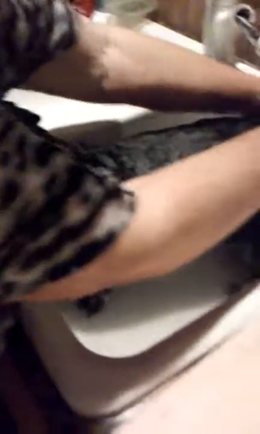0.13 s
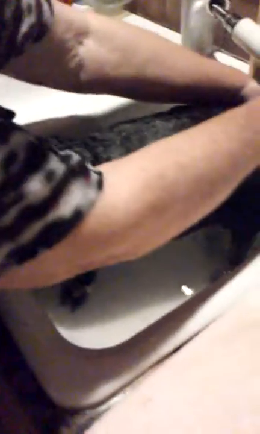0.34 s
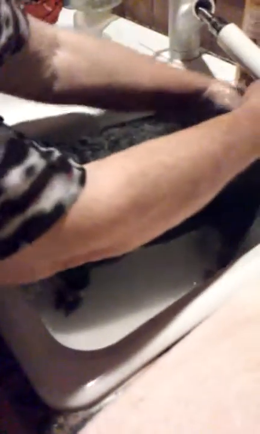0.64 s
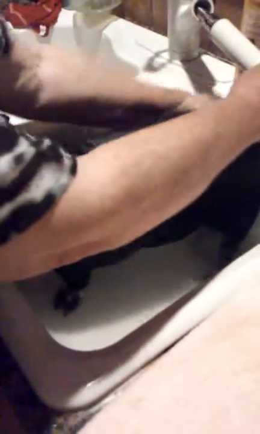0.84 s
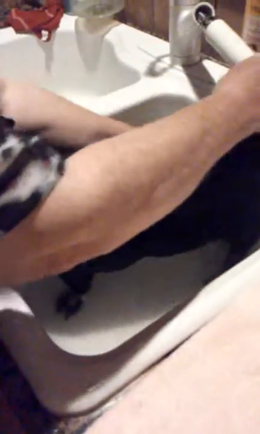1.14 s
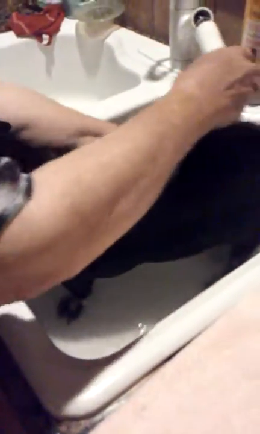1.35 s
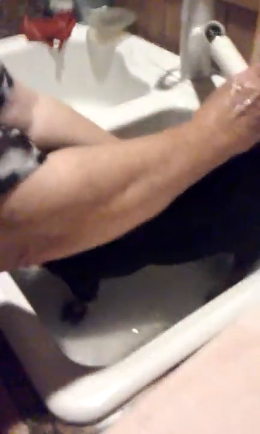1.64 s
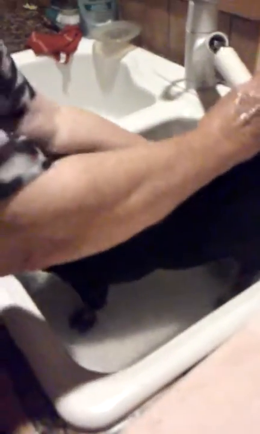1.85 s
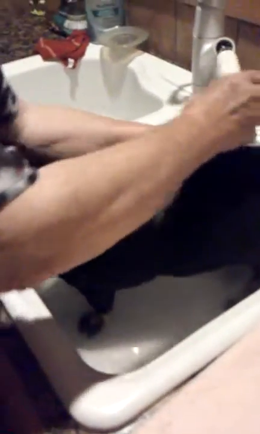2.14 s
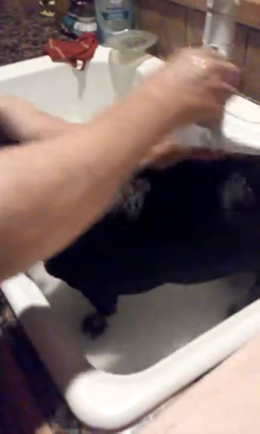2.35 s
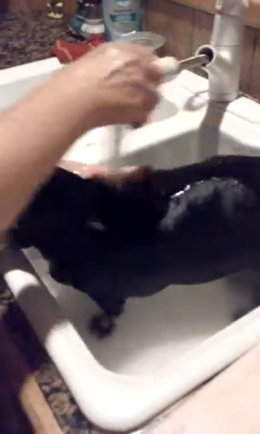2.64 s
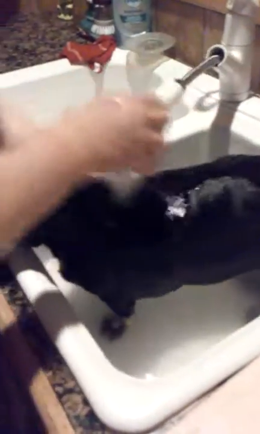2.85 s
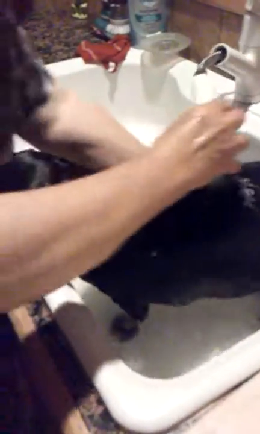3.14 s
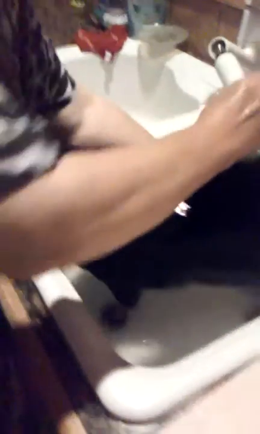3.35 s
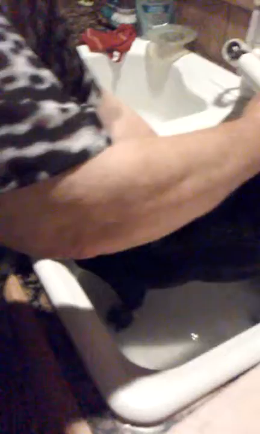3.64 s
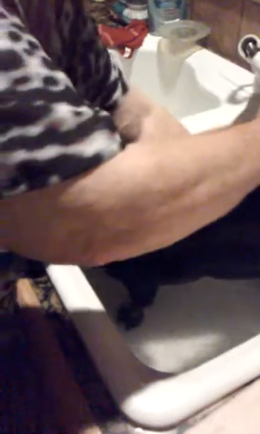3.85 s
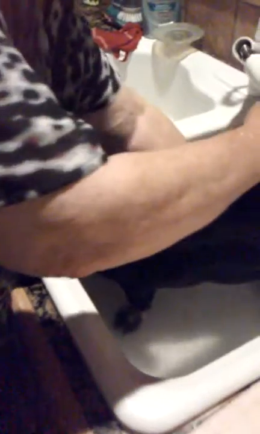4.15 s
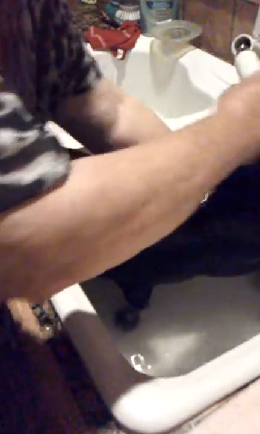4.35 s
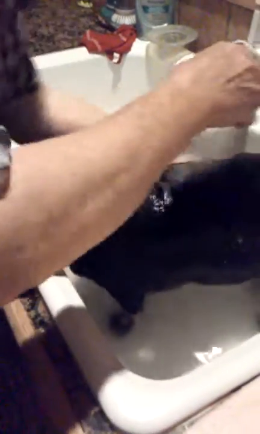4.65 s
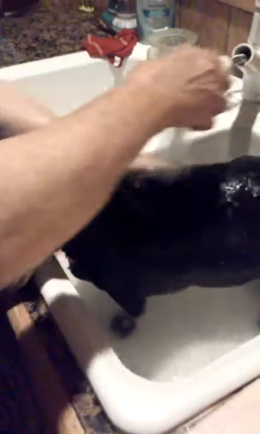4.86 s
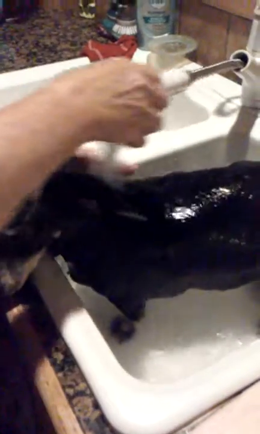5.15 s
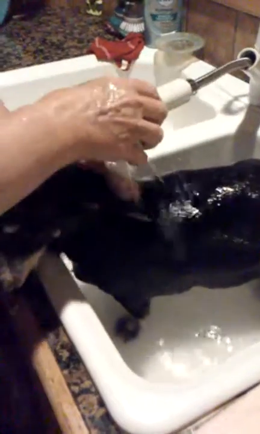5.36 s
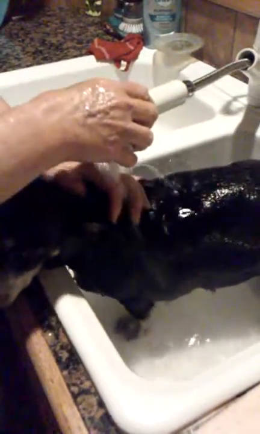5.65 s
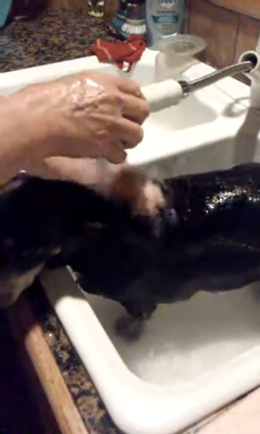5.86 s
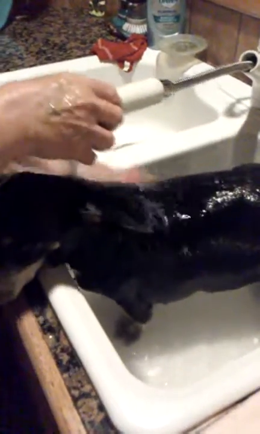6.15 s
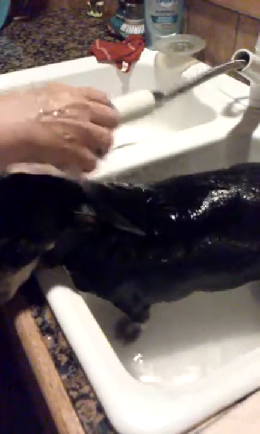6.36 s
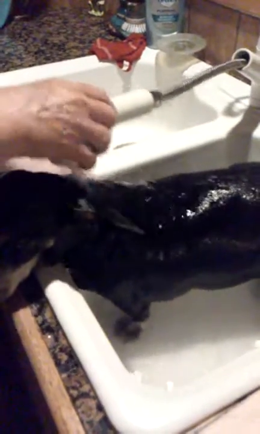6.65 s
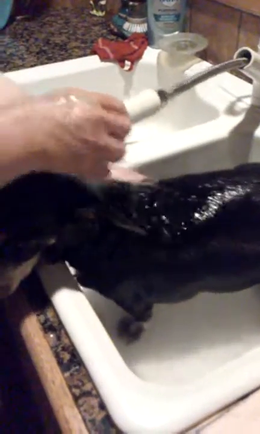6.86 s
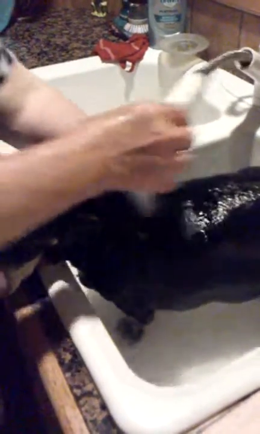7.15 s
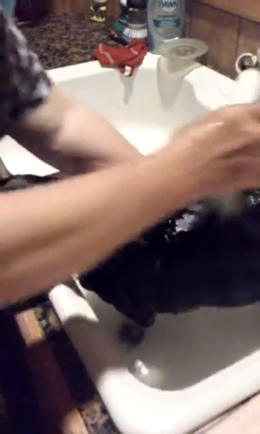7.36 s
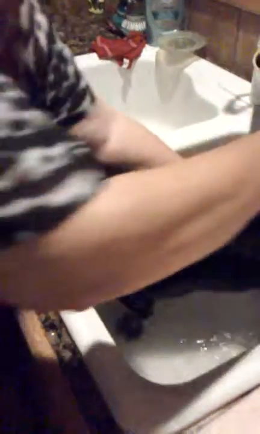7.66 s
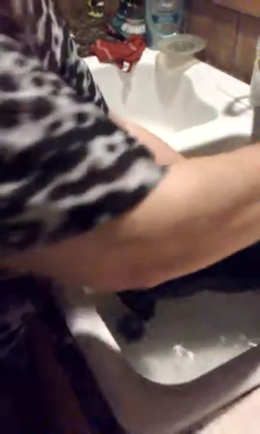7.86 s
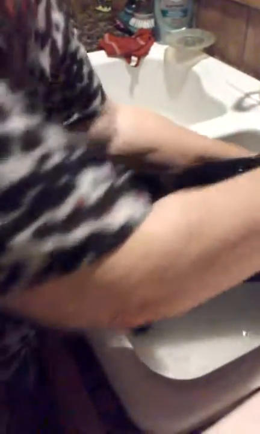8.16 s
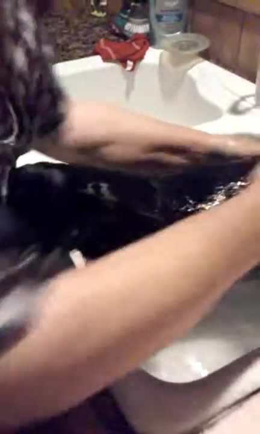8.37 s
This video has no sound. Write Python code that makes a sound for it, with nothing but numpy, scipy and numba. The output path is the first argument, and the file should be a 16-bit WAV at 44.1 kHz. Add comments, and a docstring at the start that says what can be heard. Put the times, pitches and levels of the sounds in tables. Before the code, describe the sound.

A hand sprayer rinses a small dog in a kitchen sink, heard close through a phone microphone. From 0 to 1 s two fizzy spurts spatter and gurgle, with wet splats and small plops. From 1 to 1.9 s it nearly stops, with only tiny dribbles over faint room air and low hum. A short splashy squirt comes at 1.9 s, then from 2.3 to 4 s longer spurts, sharpest near 2.9 s, with bubbly plops and a gurgling surge around 3.7 s. Plastic clacks tick at 4.3 s as spraying resumes, pulsing until 5.35 s. Dribbles follow, then a splat and round plop near 5.8 s and another spurt at 6.3 to 6.6 s. After soft thuds and drips, spray returns at 7.3 s, hissing brightly, and swells to its loudest at 8.5 s, cut off mid-flow.

```python
"""In a kitchen sink a small dog is rinsed with a hand sprayer, squeezed and released again and again.
Jets are dense random droplet clicks with high fizz; spatter, gurgle and drumming are filtered drops, bubble tones or both.
Decaying sines make plops, glugs and the sprayer's plastic clacks; noise bursts make splats and squelches.
Decaying noise echoes form basin and room, over faint room air and hum;
the phone's noise gate turns down the quiet moments and a low-pass cuts the top."""
import sys
import numpy as np
from scipy import signal
from scipy.fft import rfft, irfft, next_fast_len
from scipy.io import wavfile
from scipy.ndimage import uniform_filter1d, map_coordinates
from numba import njit

SR = 44100
rng = np.random.default_rng(int(sys.argv[2]) if len(sys.argv) > 2 else 0)


def inscribe(sig):
    """Save sig as 16-bit PCM at rate SR to the path in sys.argv[1].

    A 1-D sig is mono; a 2-D sig holds one channel per row.
    Samples are clipped to [-1, 1] before scaling.
    """
    pcm = np.round(np.clip(np.atleast_2d(sig).T, -1, 1) * 32767)
    wavfile.write(sys.argv[1], SR, pcm.astype(np.int16))


N = 375291
T = np.arange(N) / SR  # time axis [s]


def running_water(jet_db=0.53, spatter_db=0, bubble_db=-0.5, drum_db=-1.0, small_plop_db=-11, glug_db=-9,
                  stray_db=-17, dribble_spatter_db=-3, dribble_drum_db=-4, wobble_db=1.07):
    """Amplitude modulation: runs and dribbles set the strength of each texture; the aim wobbles a little."""
    hiss, slap, froth, drum = sprayer_runs() * undb(wobble_db * walk(22))
    dribble, dribble_hiss = dribbles()
    jet_level = undb(jet_db) * (hiss + dribble_hiss)
    spatter_level = undb(spatter_db) * slap + undb(dribble_spatter_db) * dribble_hiss
    gurgle_level = undb(bubble_db) * (froth + dribble)
    drum_level = undb(drum_db) * (drum + undb(dribble_drum_db) * dribble)
    water = undb(stray_db) * hiss * stray_drops()
    water += jet_level * jets()
    water += spatter_level * spatter()
    water += gurgle_level * gurgle()
    water += undb(small_plop_db) * froth * small_plops()
    water += undb(glug_db) * drum * glugs()
    return water + drum_level * drumming()


# Runs of the sprayer, steered by the hand; levels are relative, before the mix:
# (spatter above the jets [dB], drumming above the jets [dB],
#  course [(time [s], jet hiss level [dB], run-off gurgle level [dB])])
SPRAYER_RUNS = [(1, -10, [(0, -44, -43.5), (0.2, -49, -40.5), (0.24, -51.5, -52.5), (0.31, -50, -50.5),
                (0.34, -49.5, -46), (0.44, -46.5, -53.5), (0.53, -45.5, -46), (0.58, -54.5, -54)]),
                (1, -9, [(0.6, -52, -53), (0.65, -47.5, -53), (0.755, -52.5, -49.5), (0.835, -44, -37.5),
                (0.92, -51.5, -50), (0.99, -54.5, -58)]), (-0.5, -3, [(1.87, -52, -59), (1.89, -49, -39.5),
                (2.06, -64, -56.5), (2.16, -56.5, -54.5), (2.18, -70, -69)]),
                (-0.5, 0.5, [(2.295, -55.5, -42.5), (2.37, -53, -46), (2.505, -53, -51.4),
                (2.58, -54.5, -51)]), (-3, -5.5, [(2.605, -53, -47.5), (2.755, -48, -45.5),
                (2.855, -53.5, -47.5), (2.89, -40, -46.5), (2.92, -41, -40), (2.995, -45, -46),
                (3.24, -45, -44.5), (3.39, -56, -56.5), (3.445, -62, -66)]),
                (-3, -5, [(3.465, -49.5, -46.5), (3.585, -50.5, -45.5), (3.65, -54.5, -53.5),
                (3.69, -51, -35.5), (3.89, -50.5, -42), (3.945, -50.5, -55.5), (4.02, -66.1, -60.5)]),
                (0.5, -10.5, [(4.255, -62, -45.5), (4.32, -49.5, -48), (4.38, -47.5, -49.5),
                (4.4, -56.5, -60)]), (-12, -12.5, [(4.64, -51, -49), (4.66, -45, -36.5),
                (4.8, -50.5, -58.5), (4.865, -49, -63)]), (-6, -6.5, [(4.885, -51, -46.5),
                (4.96, -45, -45.5), (5.13, -48.5, -44.5), (5.3, -53, -47.5), (5.345, -59.5, -59.5)]),
                (-3, -5.5, [(5.73, -48, -58.6), (5.75, -46.5, -38.5), (5.9, -46.5, -46), (5.96, -51, -51.5),
                (6.02, -62, -53.5)]), (3.5, -1.5, [(6.265, -57.5, -49.5), (6.325, -50, -39),
                (6.48, -48, -43.5), (6.6, -54, -62.5), (6.62, -68, -61)]), (-7, 12, [(6.665, -62.5, -53),
                (6.76, -69, -65)]), (-5, -7, [(7.275, -51.5, -45.5), (7.4, -41.5, -42.5), (7.52, -45, -48),
                (7.685, -52, -51.7), (7.725, -46.5, -55.5), (7.89, -51, -53)]),
                (-1.5, -3, [(7.92, -54, -56.5), (8.025, -54, -47.5), (8.155, -43.5, -53), (8.195, -46, -34),
                (8.29, -51, -50.5), (8.415, -40, -44), (8.5, -36.5, -37.5)])]


def sprayer_runs(drum_follow=0.62):
    """Common drive: the jets' strength also sets spatter and, with flattened swells, drumming."""
    total = np.zeros((4, N))
    for spatter_db, drum_db, course in SPRAYER_RUNS:
        s, jet_db, gurgle_db = np.transpose(course)
        jet = np.interp(T, s, jet_db)
        gurgle_course = np.interp(T, s, gurgle_db)
        # drum_follow is the share of the jets' swells, in dB, that the drumming follows
        drum = drum_follow * jet + (1 - drum_follow) * np.mean(jet_db)
        strengths = undb([jet, jet + spatter_db, gurgle_course, drum + drum_db])
        total += valve(s[0], s[-1]) * strengths
    return total


def valve(start, stop, open_s=0.0036, close_s=0.0057):
    """Exponential transients: flow builds up as the lever is pressed, holds, and dies away on release."""
    opening = np.exp(np.minimum(T - start, 0) / open_s)
    closing = np.exp(-np.maximum(T - stop, 0) / close_s)
    return opening * closing


# Spectrum of the fine jets: (frequency [Hz], relative gain [dB])
JET_SPECTRUM = [(1000, -31), (3000, -14), (4800, -8.5), (5700, 2), (7500, 4.5), (9500, 1), (11200, 2),
                (14000, 0), (16000, -2.5)]


def jets(per_s=8000, spread_db=4.5, flutter_db=2.5, fizz_db=-4):
    """Jet break-up: thousands of droplets a second tick and fizz on the fur, merging into a hiss."""
    fizz = swarm(count=20000, low_hz=3507, high_hz=14930, cycles=28, spread_db=13.5, rise=0.033)
    droplets = unit(drops(per_s, spread_db)) + undb(fizz_db) * fizz
    hiss = colour(droplets, JET_SPECTRUM) * undb(flutter_db * walk(70))
    return shifting(hiss, patchy_db=0.0, rate=90)  # 0 dB keeps the bands of the hiss in step


# Spectrum of the slaps and their bubbles: (frequency [Hz], relative gain [dB])
SPATTER_SPECTRUM = [(250, -17), (520, -12.5), (740, -11), (1000, -15.5), (1200, -0.5), (2200, -1),
                    (3300, 6), (4000, 3), (4800, 9.5), (5600, -11.5), (9000, -12.5)]


def spatter(per_s=2400, spread_db=1.5, flutter_db=2.5, ring_db=-1):
    """Impact and resonance: larger drops slap the wet basin and trap tiny bubbles."""
    rings = swarm(count=9000, low_hz=703.6, high_hz=5722, cycles=39, spread_db=6.0, rise=0.028)
    impacts = unit(drops(per_s, spread_db)) + undb(ring_db) * rings
    slaps = colour(impacts, SPATTER_SPECTRUM) * undb(flutter_db * walk(55))
    return shifting(slaps, patchy_db=5.0, rate=45)


# Spectrum of the gurgling run-off: (frequency [Hz], relative gain [dB])
BUBBLE_SPECTRUM = [(300, -13.5), (560, -27.5), (760, -37), (1050, -2), (1300, -10), (1600, -0.5),
                   (2050, 5.5), (2500, 0.5), (3100, -14.5), (3900, -19.5), (4700, -6.5), (5700, -10)]


def gurgle(froth_db=-4, flutter_db=3.0):
    """Bubble resonance: a swarm of small bubbles in the run-off, over the froth that makes them."""
    rings = swarm(count=14000, low_hz=456.0, high_hz=3627, cycles=20, spread_db=6.5, rise=0.032)
    froth = unit(drops(2600, 7.2))
    wash = colour(rings + undb(froth_db) * froth, BUBBLE_SPECTRUM)
    return unit(wash * undb(flutter_db * walk(70)))


# Spectrum of thuds on the basin floor: (frequency [Hz], relative gain [dB])
BASIN_SPECTRUM = [(25, -23.5), (55, 7), (95, -6), (130, 5.5), (190, 2), (245, -8), (320, -6), (460, -12),
                  (620, -25.5), (1600, -25)]


def drumming(per_s=260, spread_db=4):
    """Impulse excitation: heavy run-off thuds on the basin floor."""
    return unit(colour(drops(per_s, spread_db), BASIN_SPECTRUM))


def glugs():
    """Low bubble resonance: water pooled on the basin floor bubbles in short notes."""
    return swarm(count=420, low_hz=146, high_hz=751.4, cycles=22, spread_db=6.0, rise=0.032)


def small_plops():
    """Sparse bubble resonance: single small pockets ring out of the run-off."""
    return swarm(count=150, low_hz=1392, high_hz=3200, cycles=44, spread_db=1.0, rise=0.07)


# Short dribbles between the squeezes; levels before the mix:
# (time [s], nominal length [s], bubble level [dB], hiss level [dB])
DRIBBLE_EVENTS = [(1.019, 0.037, -58, -61.5), (1.097, 0.02, -51.5, -62), (1.132, 0.026, -55, -62.5),
                  (1.288, 0.0066, -53.5, -59), (1.604, 0.068, -50, -65.5), (2.199, 0.01, -50.5, -68),
                  (4.124, 0.041, -53, -60), (4.168, 0.025, -56, -61), (4.468, 0.11, -60.5, -60.5),
                  (4.55, 0.083, -53, -53), (5.395, 0.073, -55, -60.5), (5.575, 0.033, -49, -55.5),
                  (6.822, 0.045, -54, -53), (6.94, 0.0098, -58, -74), (6.986, 0.0091, -55.5, -63.5),
                  (7.09, 0.022, -57.5, -65), (7.135, 0.022, -63, -66.5), (7.196, 0.045, -49, -58.5)]


def dribbles(hold=0.58, edge_s=0.0094):
    """Envelopes of bubbles and hiss: a quick start, a hold for a share of the length, an exponential fade."""
    froth, hiss = np.zeros(N), np.zeros(N)
    t = np.arange(SR // 5) / SR
    attack = np.minimum(t / .002, 1)
    for at, length, bubble_db, hiss_db in DRIBBLE_EVENTS:
        shape = attack * np.exp(-np.maximum(t - hold * length, 0) / edge_s)
        add(froth, at, undb(bubble_db) * shape)
        add(hiss, at, undb(hiss_db) * shape)
    return froth, hiss


# Large air pockets that ring as water falls off the coat; level and decay are scaled below:
# (time [s], starting pitch [Hz], relative level [dB], relative 60 dB decay [s])
AIR_POCKETS = [(0.151, 2350, -21.5, 0.022), (0.122, 720, -42, 0.16), (0.285, 724, -44, 0.16),
               (0.335, 733, -44, 0.077), (0.695, 1227, -24.5, 0.084), (0.765, 1710, -19.5, 0.028),
               (0.814, 741, -23, 0.14), (0.827, 1088, -18.5, 0.085), (0.911, 1560, -21, .03),
               (0.957, 221, -25.5, 0.043), (1.099, 1630, -32.5, 0.027), (1.293, 818, -41, 0.041),
               (1.612, 2193, -29, 0.029), (1.885, 2420, -14.5, 0.031), (1.902, 2100, -21.5, 0.035),
               (2.085, 1050, -27.5, 0.098), (2.108, 2240, -17, 0.02), (2.346, 222, -16, 0.05),
               (2.39, 208, -34, 0.14), (2.365, 1830, -13, 0.019), (2.635, 430, -40.5, 0.22),
               (2.7, 449, -40, 0.33), (2.914, 2180, -15, 0.028), (3.069, 841, -25.5, 0.2),
               (3.095, 892, -27.5, 0.069), (3.113, 4660, -17.5, 0.04), (3.179, 1950, -20.5, 0.053),
               (3.229, 734, -13.5, 0.034), (3.254, 706, -27.5, .12), (3.47, 909, -36, 0.19),
               (3.677, 1508, -23, 0.14), (3.705, 1013, -24.5, .1), (3.706, 350, -18, 0.11),
               (3.746, 506, -21, 0.067), (3.75, 1740, -19, 0.047), (3.867, 1360, -16.5, 0.037),
               (4.274, 722, -35, 0.14), (4.275, 480, -25.5, 0.038), (4.668, 484, -23.5, 0.046),
               (4.671, 370, -18, 0.046), (4.671, 1120, -24.5, .02), (4.681, 2250, -19, 0.019),
               (4.764, 2230, -15, 0.022), (4.928, 2190, -18, 0.022), (4.972, 928, -38.5, 0.11),
               (5.056, 1145, -27.5, 0.068), (5.12, 1165, -35, 0.11), (5.282, 2050, -20.5, .015),
               (5.811, 1185, -27.5, 0.086), (5.812, 740, -16, 0.043), (5.837, 804, -27, 0.042),
               (5.825, 2017, -21, 0.047), (5.87, 1808, -11.5, 0.052), (5.915, 220, -35, 0.16),
               (5.961, 200, -32.5, 0.15), (6.325, 2003, -27.5, 0.13), (6.523, 514, -27.5, 0.23),
               (6.566, 555, -31.5, 0.15), (6.665, 798, -36.5, 0.09), (6.839, 1142, -44, 0.12),
               (7.373, 2220, -28, 0.14), (7.453, 2420, -30.5, 0.083), (7.94, 717, -46.5, 0.34),
               (8.095, 198, -14.5, .035), (8.141, 808, -27.5, 0.077), (8.151, 1113, -22.5, .06),
               (8.354, 157, -35.5, 0.25), (8.409, 2010, -19, 0.1), (8.445, 1113, -22, 0.027)]


def plops(plop_db=-1, ring=0.81, pitch_rise=0.09, rough=0.41, swell_s=0.0013, shed_db=-17,
          shed_spread_db=12, shed_s=0.037, parent_floor_hz=750, count=6):
    """Bubble resonance and break-up: large pockets ring, shaken by the water, and shed higher bubbles."""
    s, hz, db, decay = np.array(AIR_POCKETS, float).T.copy()
    rise = np.full(len(s), pitch_rise)  # share climbed in one decay time
    pockets = bubbles(s, hz, ring * decay, undb(db + plop_db), rise, .5 + swell_s * hz)
    delay, smaller, weaker = rng.random((len(s) * count, 3)).T
    parent_hz = np.repeat(np.maximum(hz, parent_floor_hz), count)
    shed_hz = parent_hz * (1.2 + 1.8 * smaller ** 2)
    shed_size = undb(np.repeat(db, count) + shed_db - shed_spread_db * weaker)
    shed_start = np.repeat(s, count) + shed_s * delay
    shed = bubbles(shed_start, shed_hz, 26 / shed_hz, shed_size, 0.043 * weaker, 1 + weaker)
    return shaken(pockets + shed) * (1 + rough * walk(200))


def shaken(x, wobble_s=0.00007, rate=160):
    """Frequency modulation by varying delay: moving water pushes a ringing pocket, so its pitch wavers."""
    moved_s = T + wobble_s * walk(rate)
    return map_coordinates(x, [moved_s * SR], order=3, mode="nearest")


# Spectrum of sharp droplet impacts: (frequency [Hz], relative gain [dB])
SPLAT_SPECTRUM = [(300, -37.5), (1000, -5), (2200, -19.5), (3300, 9), (4000, -2), (4800, 17.5), (5800, -2),
                  (8000, 4.5), (12000, 3.5), (16000, -11.5)]


def stray_drops(per_s=30, spread_db=3.5):
    """Sparse impacts: fat drops leave the jets and smack down singly, at random moments."""
    return unit(colour(drops(per_s, spread_db), SPLAT_SPECTRUM))


# Sharp splats and squelches: (time [s], relative level [dB], centre of the ring [Hz])
SPLAT_EVENTS = [(0.026, -17.5, 8100), (0.208, -14.5, 3550), (0.3668, -17.5, 4750), (0.43, -19.5, 8000),
                (0.6, -16, 4750), (0.673, -19, 10800), (0.815, -8.5, 4470), (1.884, -13.5, 3020),
                (2.078, -29.5, 4500), (2.896, -13.5, 8460), (3.226, -23, 4960), (3.564, -22, 2700),
                (3.716, -23.5, 5200), (4.665, -17.5, 5200), (4.884, -30, 3100), (5.726, -29, 4310),
                (5.738, -23, 4296), (5.752, -15.5, 4400), (6.266, -31.5, 4700), (6.411, -24, 8250),
                (6.515, -14.5, 3040), (6.826, -30, 4320), (8.137, -17, 5140), (8.2, -16, 3470),
                (8.302, -19, 4600)]


def splats(splat_db=-7, ring_db=1, sharpness=4, t60_s=0.033):
    """Resonant noise burst: a gush hits hand or basin, and a squeezed air pocket rings briefly."""
    out = np.zeros(N)
    t = np.arange(SR // 6) / SR
    shape = np.minimum(t / 0.0022, 1) * np.exp(-np.log(1000) * t / t60_s)
    for s, db, hz in SPLAT_EVENTS:
        noise = rng.standard_normal(len(t))
        ring = signal.lfilter(*signal.iirpeak(hz, sharpness, SR), noise)
        burst = unit(colour(noise, SPLAT_SPECTRUM)) + undb(ring_db) * unit(ring)
        add(out, s, undb(db + splat_db) * shape * burst / 2)
    return out


# Clacks of the plastic sprayer: (time [s], relative level [dB])
CLACK_EVENTS = [(0.066, -26.5), (3.230, -30), (4.252, -36), (4.261, -27), (4.274, -30), (4.279, -20),
                (4.296, -16.5), (4.301, -25), (5.28, -29.5), (7.378, -61), (7.453, -22)]
# What the sprayer rings with, before each knock's scatter:
# (frequency [Hz], relative level [dB], 60 dB decay [s])
PLASTIC_MODES = [(720, -27.5, 0.023), (1120, -27, 0.0061), (1720, -3.5, 0.03), (2154, -3, 0.027),
                 (2700, -48, 0.00697), (3210, -10.5, 0.003), (4630, -8, 0.0062)]


def clacks(clack_db=-3, scatter_db=2, detune=0.045):
    """Modal synthesis: each knock rings the sprayer's short modes, a little differently every time."""
    hz, mode_db, t60 = np.array(PLASTIC_MODES, float).T.copy()
    ones = np.ones(len(hz))
    out = np.zeros(N)
    for s, db in CLACK_EVENTS:
        chance = rng.standard_normal(len(hz))
        size = undb(db + clack_db + mode_db + scatter_db * chance)
        out += bubbles(s * ones, hz * (1 + detune * chance), t60, size, 0 * ones, .5 * ones)
    return out


def kitchen(x, t60_s=0.31, wet_db=-10, basin_t60_s=0.015, basin_db=-9):
    """Reverberation: quick reflections in the basin, dulled by wet fur, then the short ring of the room."""
    t = np.arange(SR // 2) / SR
    near, far = rng.standard_normal((2, len(t)))
    near = near * (t > .001) * np.exp(-np.log(1000) * t / basin_t60_s)
    far = far * (t > .007) * np.exp(-np.log(1000) * t / t60_s)
    near = colour(near / np.linalg.norm(near), [(2000, 3.0), (7000, -13)])
    far = colour(far / np.linalg.norm(far), [(200, 2.5), (2000, 0), (9000, -1)])
    echoes = undb(basin_db) * near + undb(wet_db) * far
    return x + signal.oaconvolve(x, echoes)[:N]


# Spectrum of the room air: (frequency [Hz], relative gain [dB])
ROOM_SPECTRUM = [(25, 1.5), (60, 3), (130, 1), (250, -6), (600, -21), (1100, -12.5), (1400, -13.5),
                 (2000, -9), (3500, -14.5), (4800, -17), (7000, -16.5), (16000, -17)]
# Mains hum of a kitchen appliance: (frequency [Hz], rms level before the swell [dB])
HUM_TONES = [(59.4, -63.5), (119.6, -72)]
# The hum swells and sinks: (time [s], gain [dB])
HUM_COURSE = [(0, 2.5), (2.2, -8), (2.5, 4), (3.0, 8), (3.4, 0.5), (4.6, -4.5), (5.15, 14), (5.6, -0.5),
              (6.05, -7.5), (6.4, 10), (7.0, -3.5), (8.35, 10.5)]


def background(room_db=-63.5):
    """Steady noise and amplitude-modulated tones: room air and a low hum that wavers."""
    hum = sum(undb(db) * np.sqrt(2) * np.sin(2 * np.pi * hz * T) for hz, db in HUM_TONES)
    swell = undb(np.interp(T, *np.transpose(HUM_COURSE)))
    air = unit(colour(rng.standard_normal(N), ROOM_SPECTRUM))
    return hum * swell + undb(room_db) * air


def swarm(count, low_hz, high_hz, cycles, spread_db, rise):
    """Statistical superposition: bubbles of random moment, size, pitch and decay; rise is the mean climb."""
    when, pitch, ring, climb = rng.random((count, 4)).T
    size = undb(spread_db * np.minimum(rng.standard_normal(count), 1.7))
    hz = low_hz + (high_hz - low_hz) * pitch ** 1.3
    t60 = cycles * (0.21 + 3.9 * ring) / hz
    return unit(bubbles(when * N / SR, hz, t60, size * np.sqrt(hz), 2 * rise * climb, 1 + 3 * ring))


@njit
def bubbles(start, hz, t60, size, rise, swell_cycles):
    """Damped oscillation: each tone swells over some cycles, then dies away; rise lifts its pitch."""
    out = np.zeros(N)
    for k in range(len(start)):
        first = max(int(start[k] * SR), 0)
        for i in range(min(int(t60[k] * SR), N - first)):
            t = i / SR
            swell = 1 - np.exp(-(t * hz[k] / swell_cycles[k]) ** 2)
            decay = np.exp(-6.9 * t / t60[k])
            phase = 2 * np.pi * hz[k] * t * (1 + rise[k] * t / (2 * t60[k]))
            out[first + i] += size[k] * swell * decay * np.sin(phase)
    return out


def drops(per_s, spread_db):
    """Poisson-like impulses: random droplet impacts of unequal size and random sign."""
    chance = rng.standard_normal((2, N))
    falls = rng.random(N) < per_s / SR
    return falls * np.sign(chance[0]) * undb(spread_db * np.minimum(chance[1], 2.5))


def shifting(x, patchy_db, rate, count=12):
    """Band-wise modulation: as the wet spot moves, each band swells and fades by patchy_db on its own."""
    size = next_fast_len(N)
    spectrum = rfft(x, size)
    place = np.sqrt(np.linspace(0, 1, len(spectrum))) * (count - 1)
    out = np.zeros(N)
    for k in range(count):
        overlap = np.maximum(1 - np.abs(place - k), 0)  # neighbouring bands sum to 1
        out += irfft(spectrum * overlap, size)[:N] * undb(patchy_db * walk(rate))
    return unit(out)


def walk(rate):
    """Random modulation: straight lines between normal random values, rate of them per second."""
    steps = rng.standard_normal(4096)
    return np.interp(T * rate, np.arange(len(steps)), steps)


def colour(x, points, size=2048):
    """Minimum-phase filtering through (frequency [Hz], gain [dB]) points, by folding the cepstrum."""
    hz, db = np.transpose(points)
    bin_hz = np.arange(size // 2 + 1) * SR / size
    log_gain = np.log(undb(np.interp(np.log(bin_hz + 1), np.log(hz), db)))
    cepstrum = irfft(log_gain)
    cepstrum[1:size // 2] *= 2
    cepstrum[size // 2 + 1:] = 0
    return signal.oaconvolve(x, irfft(np.exp(rfft(cepstrum))))[:len(x)]


def undb(db):
    """Logarithmic level: decibels to amplitude gain."""
    return 10 ** (np.asarray(db) / 20)


def unit(x):
    """Effective value: scale to rms 1."""
    return x / np.sqrt(np.mean(x ** 2))


def add(out, s, sound):
    """Superposition: mix a sound in from time s [s] on."""
    i = max(int(s * SR), 0)
    out[i:i + len(sound)] += sound[:max(N - i, 0)]


def scene():
    """Superposition of all the sounds at the sink, at one microphone."""
    sources = running_water() + plops() + splats() + clacks()
    return (kitchen(sources) + background())[None]


def noise_gate(x, open_db=-54, slope=2.43, depth_db=12.5):
    """Downward expansion: turns the sound down as its level above the bass sinks under a threshold."""
    key = signal.sosfilt(signal.butter(2, 300, "high", fs=SR, output="sos"), x)
    power = signal.lfilter([1 / 180], [1, 1 / 180 - 1], key ** 2)  # running mean power over about 4 ms
    level_db = 10 * np.log10(power + 1e-12)
    gain_db = np.clip(slope * (level_db - open_db), -depth_db, 0)  # slope in dB per dB
    return x * undb(uniform_filter1d(gain_db, size=130))


def record(dry, top_hz=15900):
    """Gating and band limiting: the phone gates the quiet moments and cuts the top."""
    low_pass = signal.ellip(10, .2, 70, top_hz, fs=SR, output="sos")
    return signal.sosfilt(low_pass, noise_gate(dry))


dry = scene()
out = record(dry)
inscribe(out)
```